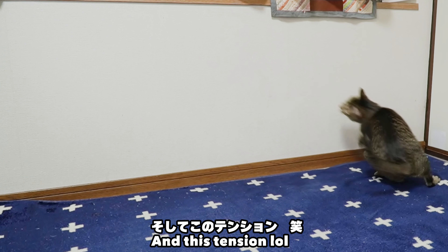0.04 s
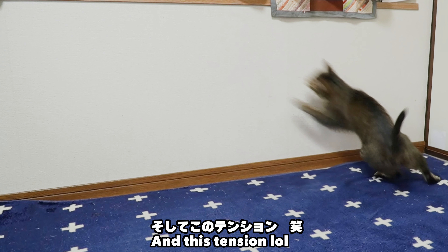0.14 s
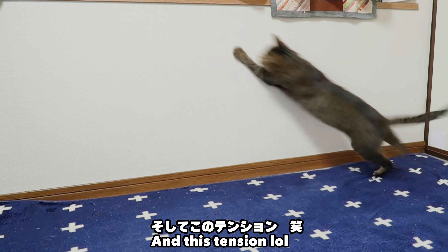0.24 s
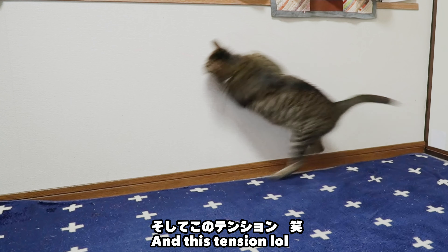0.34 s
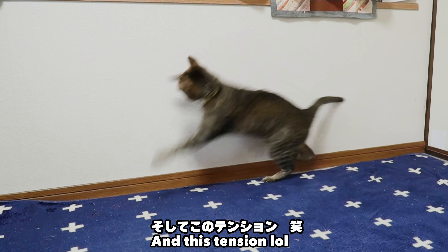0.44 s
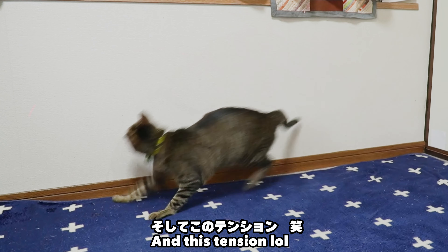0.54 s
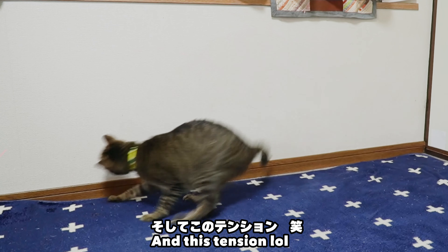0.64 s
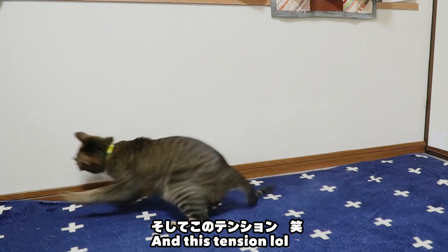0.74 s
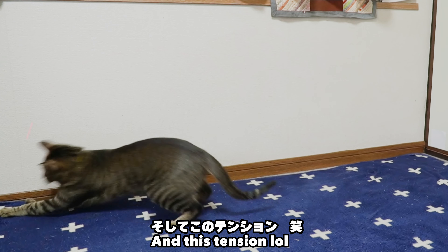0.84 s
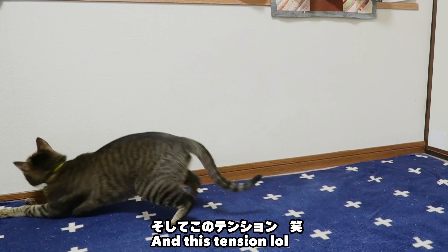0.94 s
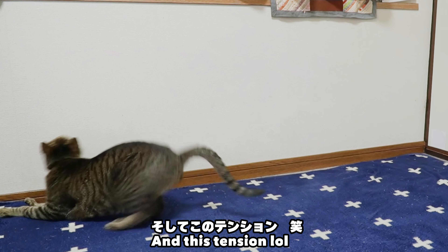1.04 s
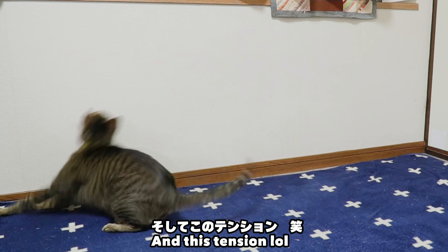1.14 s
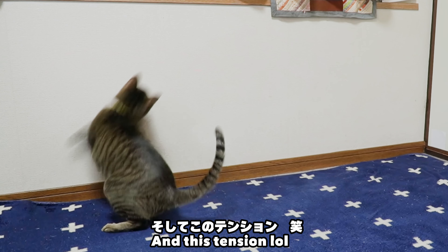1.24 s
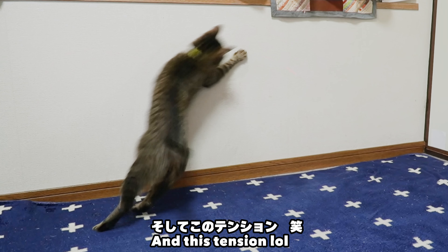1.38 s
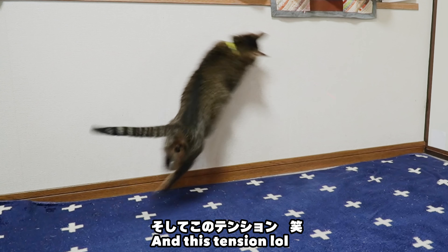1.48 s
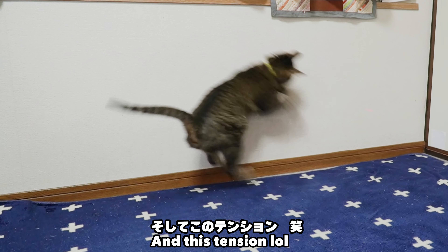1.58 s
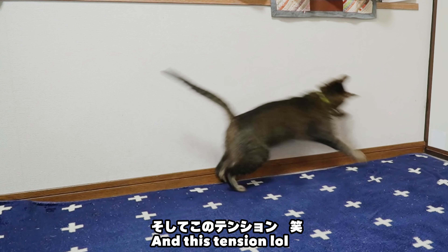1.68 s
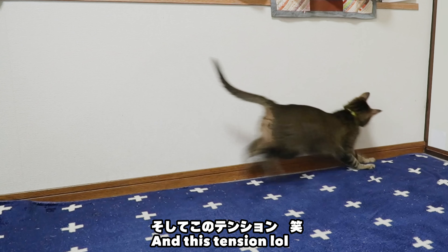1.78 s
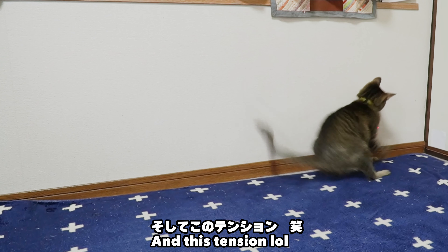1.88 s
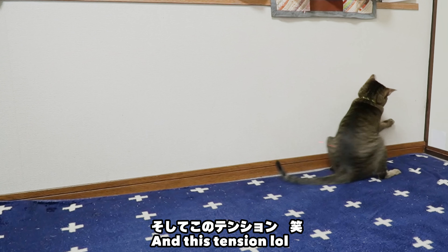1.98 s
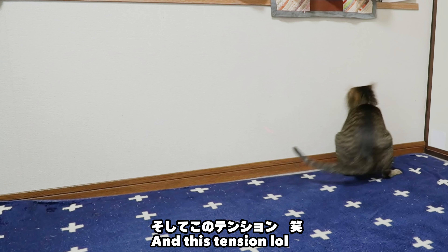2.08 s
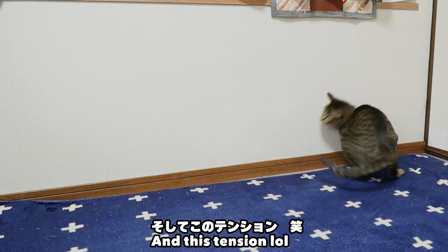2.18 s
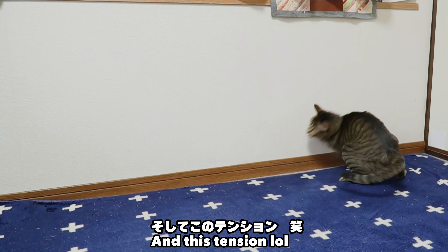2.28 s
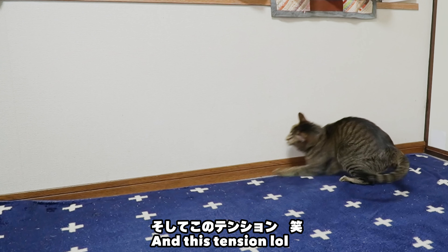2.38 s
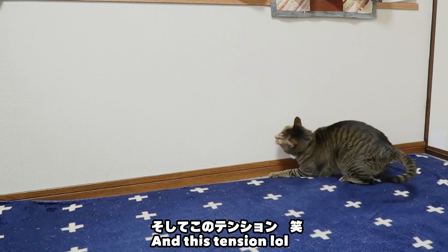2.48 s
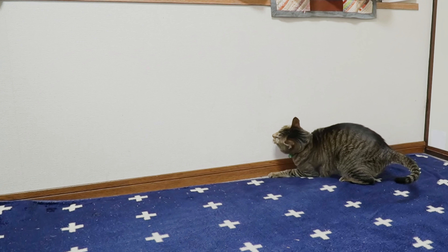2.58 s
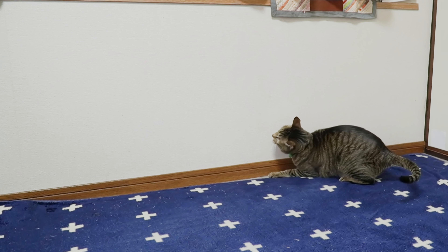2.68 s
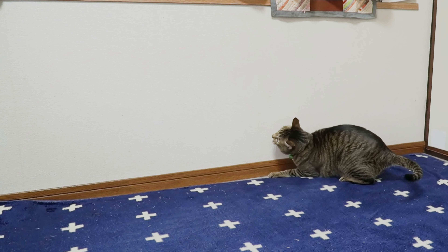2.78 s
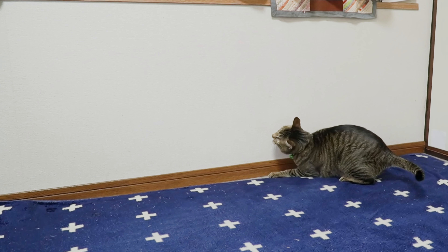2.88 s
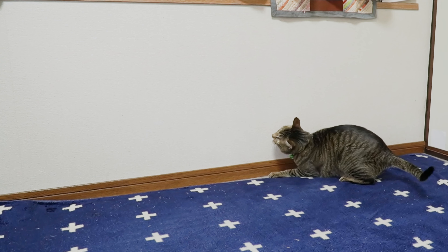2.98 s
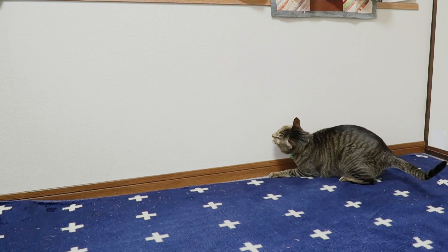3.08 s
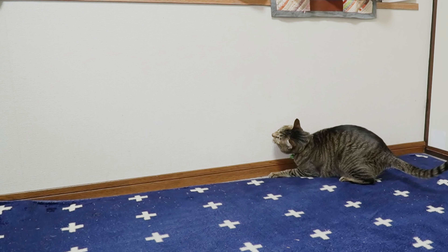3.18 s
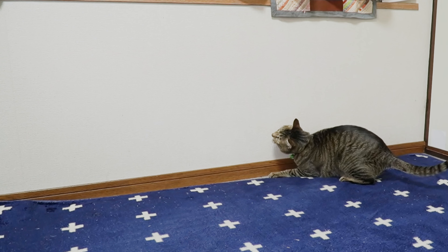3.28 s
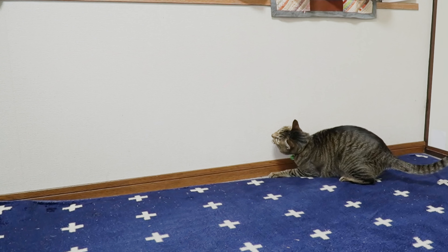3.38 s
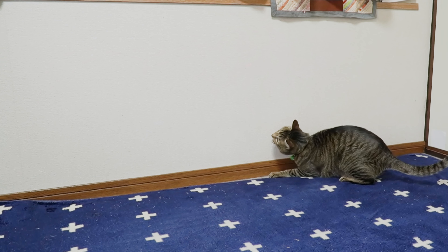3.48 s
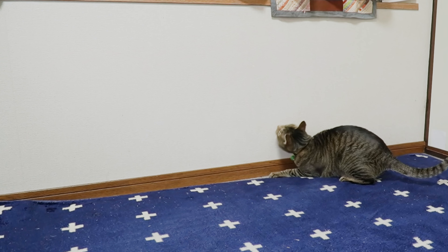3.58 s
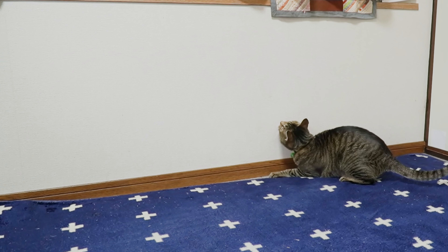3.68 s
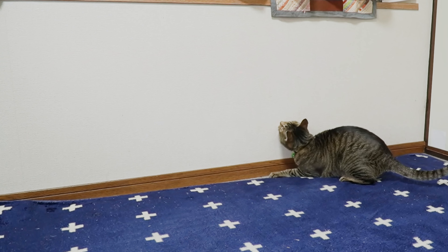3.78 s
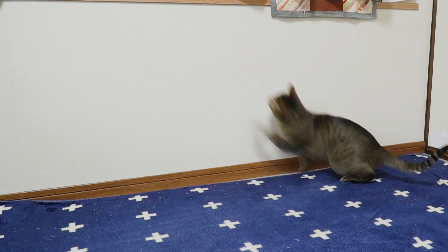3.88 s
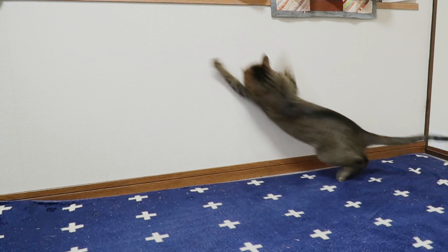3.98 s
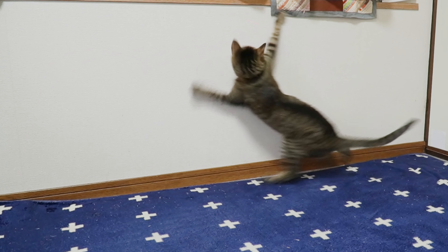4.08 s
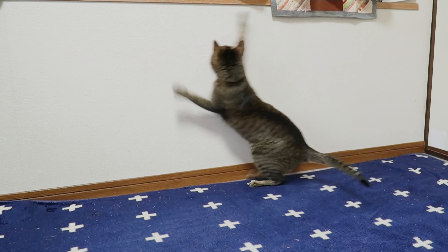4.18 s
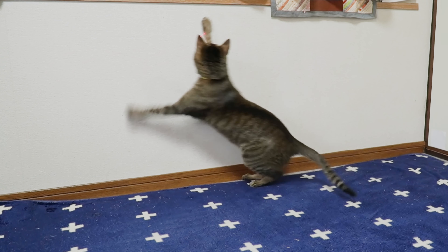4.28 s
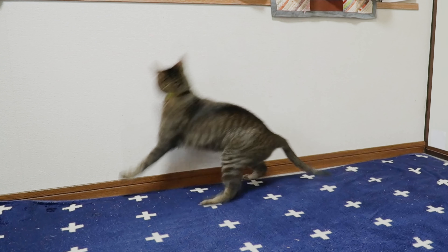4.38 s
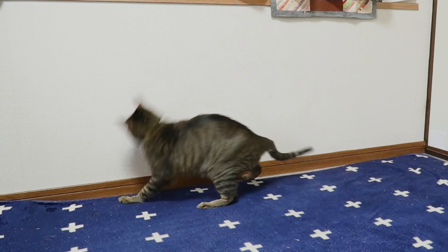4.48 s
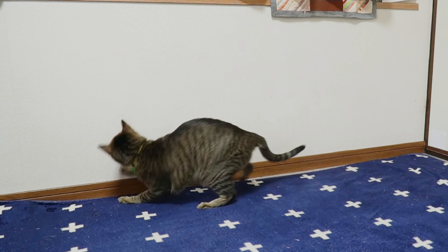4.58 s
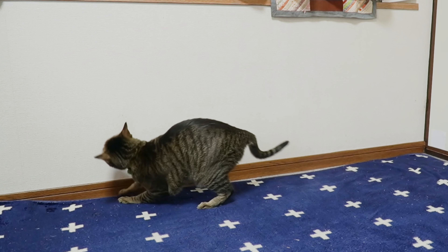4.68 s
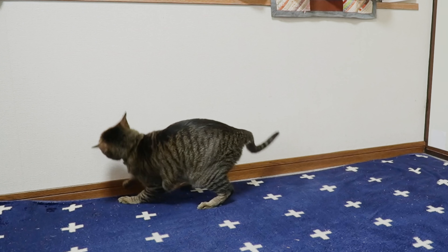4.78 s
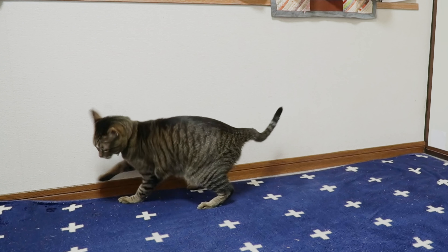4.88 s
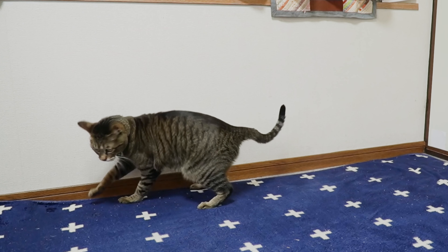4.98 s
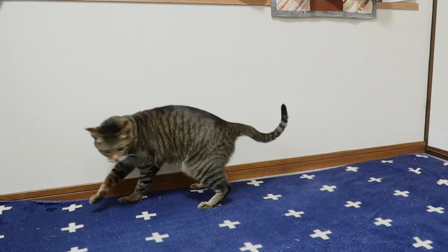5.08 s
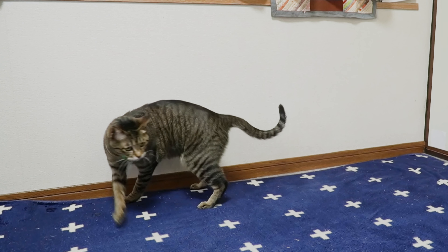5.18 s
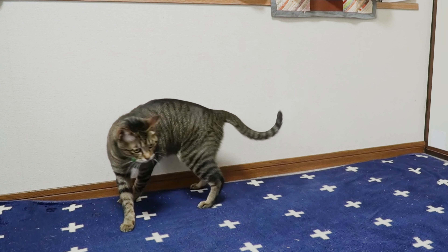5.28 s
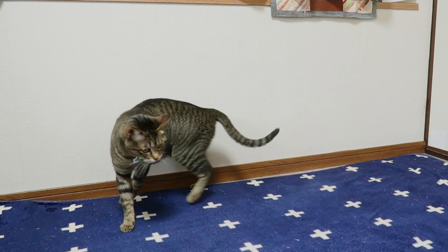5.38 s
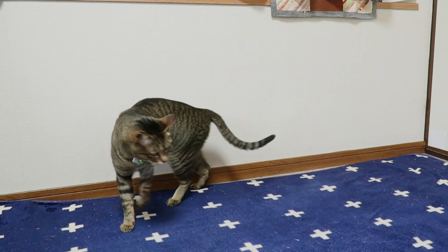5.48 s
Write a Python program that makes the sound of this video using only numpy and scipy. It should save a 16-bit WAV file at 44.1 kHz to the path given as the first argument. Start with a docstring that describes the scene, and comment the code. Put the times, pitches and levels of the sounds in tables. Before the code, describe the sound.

A cat scampers and pounces along a wall with hollow paw thuds, claw scrapes, squeaks and collar ticks, rests, then leaps again.

```python
"""Cat pouncing along a wall

A cat leaps, lands and scampers along the wall of a small carpeted room, rests, then pounces again.
Paw blows are short panel thuds with ringing boards and a noise slap; carpet and claws are tiny random snaps,
the carpet's shaped into hiss and drag, the claws' into scrapes and pitched rasps. The collar ticks and
chatters in metal resonances, skidding pads squeak as unsteady tones, and fur swishes as shaped noise.
A short echo surrounds the cat; soft air noise and mains hum lie underneath."""
import sys
import numpy as np
from scipy import signal
from scipy.fft import rfft, irfft
from scipy.io import wavfile
from scipy.ndimage import uniform_filter1d

SR = 44100
rng = np.random.default_rng(int(sys.argv[2]) if len(sys.argv) > 2 else 0)


def transcribe(u):
    """Save the signal u as a 16-bit wav file named by the first command-line argument.

    u: samples, shape (n,) or (channels, n), limited to [-1, 1]; the rate is SR.
    q: integer samples, one column per channel.
    """
    v = np.clip(np.atleast_2d(u).T, -1, 1)
    q = np.round(v * 32767).astype(np.int16)
    wavfile.write(sys.argv[1], SR, q)


N = 244314
T = np.arange(int(.7 * SR)) / SR  # time axis of one sound, s

# soft air noise, before its overall level: [f/Hz, level per Hz/dB]
AIR_SPECTRUM = [(15, -31), (25, 9), (54, -7), (121, -5.5), (172, -15), (354, -16), (637, -20),
                (1210, -21.5), (1390, -27), (2240, -26.5), (3930, -34.5), (15000, -46)]
AIR_DB = -52
# mains hum partials: [f/Hz, rms level/dB]
HUM_PARTIALS = [(59.7, -52.5), (120, -58), (180, -74), (240, -72), (360, -67.5), (480, -71)]

# scuffs of paws and fur on the carpet: [t/s, hiss level/dB, fade t60/s]
CARPET_SCUFFS = [(0, -44.5, 0.32), (0.21, -42.5, 0.97), (0.324, -41.5, 0.088), (0.367, -39.5, 0.081),
                 (0.567, -60, .1), (.803, -44, .24), (0.949, -54.5, 0.71), (1.116, -44.5, 0.12),
                 (1.19, -49.5, 0.099), (1.279, -50, 0.89), (1.335, -38.5, 0.21), (1.576, -60, 0.98),
                 (1.751, -49.5, 0.17), (1.914, -50, 1), (2.241, -53, 0.057), (3.969, -44, 0.21),
                 (4, -40, 0.19), (4.053, -44, .27), (4.173, -47, 0.23), (4.208, -43, 0.26),
                 (4.369, -49, 0.57), (4.42, -42, 0.18)]
# hiss of the carpet fibres: [f/Hz, level/dB]
FIBRE_SPECTRUM = [(500, 9.5), (1800, 3), (3000, 7.5), (3800, -0.5), (5000, 4), (7500, -6), (10000, -6.5),
                  (13000, -17.5), (16000, -32)]
# drag on the coarse carpet backing: [f/Hz, level/dB]
BACKING_SPECTRUM = [(150, 22), (450, 5.5), (800, -7), (1200, 8), (1700, -9), (2600, -14), (3800, -44),
                    (9000, -23)]
SCUFF_RISE_S = 0.0058
# a paw that digs in drags the backing: reference hiss level (dB), backing over the hiss there (dB),
# extra dB per dB of hiss above the reference
DIG_DB, BACKING_DB, BACKING_GROWTH = -49.5, 3.5, 0.49

# collar clinks, before the common trims: [t/s, click level/dB, ring level/dB]
COLLAR_CLINKS = [(.0791, -23, -46), (.1686, -35, -45.5), (0.378, -27.5, -43), (0.4362, -27, -52),
                 (0.5267, -16, -30), (0.549, -19, -47), (0.579, -23, -53), (0.993, -39, -40.5),
                 (1.0722, -37, -44), (1.1156, -18, -32.5), (1.2768, -24, -45), (1.5152, -34, -44),
                 (1.825, -41, -40.5), (1.917, -23.5, -42.5), (2.2153, -30, -37), (2.3275, -32.5, -41),
                 (2.5131, -25, -42), (2.6234, -52, -45.5), (2.7418, -35, -49), (4.0008, -42, -36),
                 (4.1738, -31.5, -52), (4.2434, -37, -42.5), (4.387, -48, -39.5), (4.4245, -40, -39),
                 (4.4378, -26, -36.5), (4.6467, -30, -51), (4.7306, -43, -44), (5.201, -48, -52.5)]
# tick of the metal fitting: [f/Hz, level/dB]
CLICK_SPECTRUM = [(600, -21), (2000, 2), (3000, 0.5), (3800, 3), (5000, 5.5), (8000, -8), (9800, 4.5),
                  (12500, -2.5), (16000, -23)]
# resonances of the fitting, before detune and tilt: [f/Hz, width/Hz, level/dB]
METAL_RESONANCES = [(2980, 135, 5.5), (3080, 100, -30), (4520, 320, 1.5), (7040, 390, 3.5), (9470, 72, 5),
                    (9170, 1000, -2.5)]
# the fitting rings bright while the cat is stretched out, dull when it crouches and fur covers it:
# [t/s, level tilt of the last resonance against the first/dB]
RING_BRIGHTNESS = [(0, -13), (1.0, -20.5), (1.28, -3), (1.55, -20.5), (2.5, -21), (2.7, -32), (4.7, -22)]

# paw blows: [t/s, thud level/dB, struck panel f/Hz, pad slap level/dB]
PAW_BLOWS = [ (0.213, -17, 105, -27.5), (.223, -16, 239, -40.5), (0.327, -33.5, 198, -37.5),
             (0.382, -19, 139.3, -42), (.502, -23, 154, -38.5), (0.5595, -26, 119.5, -29),
             (.627, -27, 104.4, -41.5), (0.6569, -35, 146, -31.5), (0.687, -31.5, 62, -74),
             (.808, -38.5, 170, -35.5), (1.073, -30.5, 102.6, -50.5), (1.107, -37, 88.5, -52),
             (1.574, -25, 185, -33.5), (1.585, -19, 145, -26.5), (1.595, -8.5, 118, -24),
             (1.652, -35, 112, -35), (1.715, -24.5, 135.4, -37), (1.773, -17, 144, -28.5),
             (1.814, -33.5, 149.5, -78), (1.851, -36, 137.5, -39.5), (1.899, -32, 50, -37),
             (1.9587, -16.5, 233, -33.5), (2.204, -34, 127, -40.5), (2.239, -38, 192, -27),
             (2.369, -27, 134, -37.5), (2.407, -32.5, 107, -57), (3.9295, -13.5, 208, -29.5),
             (3.948, -18, 177, -40), (3.9921, -9, 106.6, -23.5), (4.016, -43, 106, -45),
             (4.057, -29, 171, -46), (4.087, -19.5, 131, -44.5), (4.119, -26, 82.6, -51),
             (4.204, -24.5, 138, -49), (4.406, -22.5, 116, -53), (4.446, -21.5, 137.6, -49)]
# floor and wall panel modes, before detune, scatter and common fade: [f/Hz, level/dB, t60/s]
BOARD_MODES = [(111.3, -0.5, 0.24), (160, -36, .2), (200, 1, 0.15), (258, -2, 0.056), (297, 4.5, 0.082),
               (321, -18, 0.3), (394.2, -4.5, 0.32), (502, -4, 0.017), (546, -14, 0.024), (627, -7, 0.049),
               (701, -13.5, 0.046)]
# slap of a pad: [f/Hz, level/dB]
SLAP_SPECTRUM = [(200, -1.5), (450, 6), (750, 5), (1200, -2.5), (1600, -15.5), (2600, -15), (4000, -25),
                 (8000, -37.5), (16000, -48)]
# a firm step: thud level (dB), press time with thud and slap level (s), panel ring (cycles to fall 60 dB)
FIRM_DB, PRESS_S, THUD_CYCLES = -19, 0.0025, 10.7
# doublings of press time per dB of slap below thud; halvings of ring per dB of thud above a firm step
PRESS_PER_DB, DAMPING_PER_DB = 0.04, 0.0634
# the boards ring at a level between slap and thud: share of the thud (0-1), offset (dB)
BOARDS_SHARE, BOARDS_DB = 0.45, 1.14

# claws on the wall and skirting: [t/s, snaps level/dB, fade t60/s, rasp f/Hz, rasp level/dB]
CLAW_SCRAPES = [(.806, -34, 0.16, 700, -35), (1.344, -26, .2, 1240, -37), (1.690, -36, 0.14, 740, -48),
                (1.879, -36.5, 0.11, 750, -42), (2.178, -46, 0.11, 1130, -55),
                (2.2366, -24.5, 0.1, 1180, -26), (2.238, -26.5, .085, 2500, -30),
                (2.244, -35, 0.067, 5000, -46.5), (3.930, -29.5, 0.13, 1870, -39),
                (4.200, -62, 0.062, 4650, -40), (4.211, -35.5, 0.2, 850, -41.5),
                (4.37, -62, 0.13, 2500, -47.5)]
# snaps of a claw: [f/Hz, level/dB]
CLAW_SPECTRUM = [(200, 7.5), (500, 5.5), (900, 1), (1400, -1.5), (1900, -6.5), (2430, -22.5), (3000, -6),
                 (3800, -32.5), (5200, -20), (7000, -29), (16000, -38.5)]
SCRAPE_RISE_S = 0.0016  # a claw bites at once

# pads skidding on the wall, before waver: [t/s, level/dB, f/Hz, fade t60/s]
PAD_SQUEAKS = [(1.331, -22.5, 928, 0.15), (1.346, -19, 953, 0.065), (1.5952, -12.5, 1097, 0.024),
               (2.856, -47, 1162, .15)]
SKID_RISE_SHARE = 0.057  # a long skid also starts slowly: rise as a share of the fade

# swish of fur on the wall: [f/Hz, level/dB]
FUR_SPECTRUM = [(300, -3), (900, 0), (2600, -1), (4000, -5), (6000, -6), (9000, -11), (12000, -15),
                (15500, -19), (18000, -40)]

# colour of the room's echo: [f/Hz, level/dB]
ECHO_SPECTRUM = [(60, 12.5), (200, 0.5), (500, 4), (1000, -4.5), (5000, 2), (15000, 1)]
ROOM_T60_S, ROOM_DB = 0.28, -8.5
TOP_HZ = 15900


def undb(db):
    """Decibels to gain."""
    return 10 ** (np.asarray(db) / 20)


def unit(x):
    """Scale to an rms of 1."""
    return x / np.sqrt(np.mean(x ** 2))


def strike(x, db, size=220):
    """Scale a blow so that the rms of its loudest few milliseconds (size in samples) lies at db."""
    loudest_power = uniform_filter1d(x ** 2, size).max()
    return x * undb(db) / np.sqrt(loudest_power)


def fade(t60):
    """Exponential decay, 60 dB down after t60 seconds."""
    return np.exp(-np.log(1000) * T / t60)


def swell(rise, t60):
    """A smooth rise, then an exponential decay (both in s)."""
    attack = np.sin(np.pi / 2 * np.minimum(T / rise, 1)) ** 2
    decay = np.exp(-np.log(1000) * np.maximum(T - rise, 0) / t60)
    return attack * decay


def colour(x, points):
    """Shape a noise by (Hz, dB) points, joined on a log frequency scale; rms 1."""
    hz, db = np.transpose(points)
    f = np.maximum(np.arange(len(x) // 2 + 1) * SR / len(x), 1)
    gain = undb(np.interp(np.log(f), np.log(hz), db))
    return unit(irfft(rfft(x) * gain, len(x)))


def grains(rate, spread_db):
    """Tiny snaps at random moments (rate per s), a few of them much larger than the rest."""
    size = undb(spread_db * np.minimum(rng.exponential(size=len(T)), 4))
    return (rng.random(len(T)) < rate / SR) * size * rng.standard_normal(len(T))


def resonate(x, hz, width):
    """One resonance, gain 1 at its centre."""
    return signal.lfilter(*signal.iirpeak(hz, hz / width, fs=SR), x)


def ring(modes, detune, scatter_db):
    """Decaying modes; every point of contact weights them differently."""
    out = 0
    for hz, db, t60 in modes:
        shift, weight, side = rng.standard_normal(3)
        gain = np.sign(side) * undb(db + scatter_db * weight)
        tone = np.sin(2 * np.pi * hz * (1 + detune * shift) * T)
        out = out + gain * fade(t60) * tone
    return out


def add(track, s, sound):
    """Mix a sound in at time s."""
    i = max(int(s * SR), 0)
    track[i:i + len(sound)] += sound[:max(N - i, 0)]


def background():
    """Soft air noise and the mains hum of an appliance somewhere in the house."""
    t = np.arange(N) / SR
    hum = 0
    for hz, db in HUM_PARTIALS:
        hum = hum + undb(db) * np.sqrt(2) * np.sin(2 * np.pi * (hz * t + rng.random()))
    air = undb(AIR_DB) * colour(rng.standard_normal(N), AIR_SPECTRUM)
    return hum + air


def carpet():
    """Fibres catch and let go in a fine hiss; a paw that digs in also drags on the coarse backing."""
    out = np.zeros(N)
    for s, hiss_db, t60 in CARPET_SCUFFS:
        drag_db = hiss_db + BACKING_DB + BACKING_GROWTH * (hiss_db - DIG_DB)
        hiss = undb(hiss_db) * colour(grains(rate=7200, spread_db=1.5), FIBRE_SPECTRUM)
        drag = undb(drag_db) * colour(grains(rate=1200, spread_db=3), BACKING_SPECTRUM)
        add(out, s, swell(SCUFF_RISE_S, t60) * (hiss + drag))
    return out


def collar(rattle_db=-8):
    """Metal ticks on metal, then chatters briefly in its resonances, damped by the fur."""
    out = np.zeros(N)
    heights = np.linspace(0, 1, len(METAL_RESONANCES))
    for s, click_db, ring_db in COLLAR_CLINKS:
        bright_db = np.interp(s, *np.transpose(RING_BRIGHTNESS))
        snaps = grains(rate=8000, spread_db=3)
        click = swell(rise=0.00052, t60=0.011) * colour(snaps, CLICK_SPECTRUM)
        add(out, s, strike(click, click_db - 19.0))  # common click trim
        # a quick burst with a longer rattle beneath it
        envelope = swell(rise=0.00047, t60=0.035) + undb(rattle_db) * fade(t60=.08)
        chatter = envelope * rng.standard_normal(len(T))
        detune = 1 + .03 * rng.standard_normal()
        # the brightness tilt grows along the list of resonances
        for (hz, width, db), height in zip(METAL_RESONANCES, heights):
            level_db = ring_db + db + height * bright_db - 7.5  # common ring trim
            add(out, s, strike(resonate(chatter, hz * detune, width), level_db))
    return out


def paws(slap_tail_db=-10, stiff_share=0.64, smack_share=0.15):
    """The weight bends a panel into a short thud, the boards around it ring, and the pad slaps."""
    out = np.zeros(N)
    for s, thud_db, hz, slap_db in PAW_BLOWS:
        # a soft pad takes the weight slowly; a heavy paw damps the panel it stands on
        press = PRESS_S * 2 ** (PRESS_PER_DB * (thud_db - slap_db))
        t60 = THUD_CYCLES / hz / 2 ** (DAMPING_PER_DB * (thud_db - FIRM_DB))
        boards_db = BOARDS_DB + slap_db + BOARDS_SHARE * (thud_db - slap_db)
        # a panel radiates little far below its own pitch
        bend = swell(press, t60) * np.sin(2 * np.pi * hz * T)
        thud = signal.lfilter(*signal.butter(1, hz / 2, "high", fs=SR), bend)
        # the stiffer modes answer sooner than the thud
        modes = ring(BOARD_MODES, detune=0.012, scatter_db=3.0)
        boards = swell(stiff_share * press, t60=0.21) * modes
        # a short smack, then the loose panel chatters
        smack = swell(smack_share * press, t60=0.024)
        chatter = undb(slap_tail_db) * swell(rise=0.0058, t60=0.18)
        slap = (smack + chatter) * colour(rng.standard_normal(len(T)), SLAP_SPECTRUM)
        add(out, s, strike(thud, thud_db) + strike(boards, boards_db) + strike(slap, slap_db))
    return out


def claws(rasp_width=0.35):
    """Claws stutter over the wall in a run of snaps; each stroke rasps at a pitch of its own."""
    out = np.zeros(N)
    for s, snaps_db, t60, hz, rasp_db in CLAW_SCRAPES:
        snaps = grains(rate=4900, spread_db=4.5)
        width = hz * rasp_width
        rasp = unit(resonate(resonate(snaps, hz, width), hz, width))
        scrape = undb(snaps_db) * colour(snaps, CLAW_SPECTRUM) + undb(rasp_db) * rasp
        add(out, s, swell(SCRAPE_RISE_S, t60) * scrape)
    return out


def squeaks(waver=0.1025, overtone_db=-22):
    """A pad sticks and slips at an unsteady rate; waver is the rms pitch drift as a share of the pitch."""
    out = np.zeros(N)
    for s, db, hz, t60 in PAD_SQUEAKS:
        drift = unit(uniform_filter1d(rng.standard_normal(len(T)), size=130))
        grip = unit(uniform_filter1d(rng.standard_normal(len(T)), size=130))
        phase = 2 * np.pi * np.cumsum(hz * (1 + waver * drift)) / SR
        tone = np.sin(phase) + undb(overtone_db) * np.sin(2 * phase)
        level = undb(db + 0.85 * grip)  # the level wavers too
        add(out, s, level * swell(SKID_RISE_SHARE * t60, t60) * tone)
    return out


def brush(s=1.965, db=-47.0, rise=0.11, t60=0.57):
    """The turning cat sweeps its fur along the wall: a soft, airy swish."""
    out = np.zeros(N)
    swish = colour(rng.standard_normal(len(T)), FUR_SPECTRUM)
    add(out, s, undb(db) * swell(rise, t60) * swish)
    return out


def room(x):
    """Bare walls over a carpet return a short, diffuse tail: decaying noise convolved with the sound."""
    tail = colour(rng.standard_normal(len(T)), ECHO_SPECTRUM) * swell(rise=0.0034, t60=ROOM_T60_S)
    tail = tail / np.sqrt(np.sum(tail ** 2))  # unit energy
    return x + undb(ROOM_DB) * signal.fftconvolve(x, tail)[:N]


def scene():
    """The cat with the echo of its room, over air and hum."""
    cat = paws() + collar() + carpet() + brush() + claws() + squeaks()
    return (room(cat) + background())[None]


def record(dry):
    """The recorder cuts the top with a steep low-pass."""
    low_pass = signal.ellip(10, .2, 70, TOP_HZ, fs=SR, output="sos")
    return signal.sosfilt(low_pass, dry)


dry = scene()
out = record(dry)
transcribe(out)
```